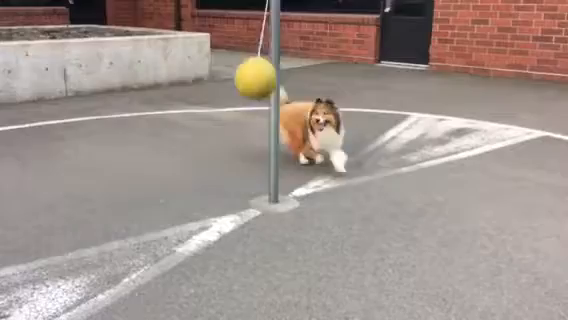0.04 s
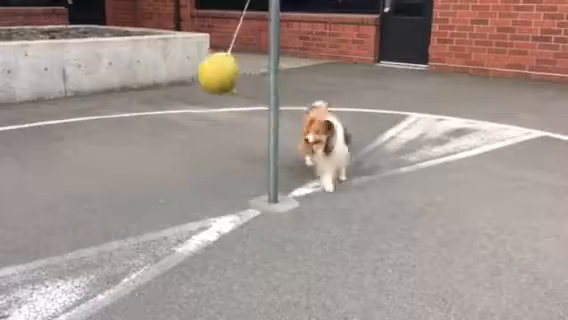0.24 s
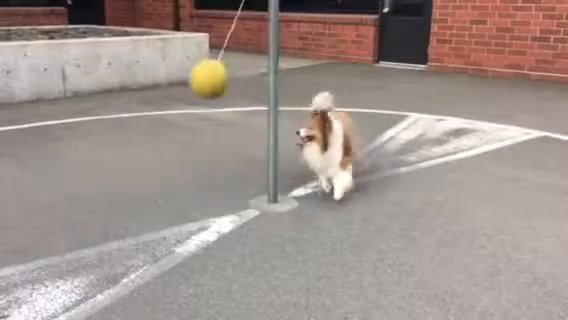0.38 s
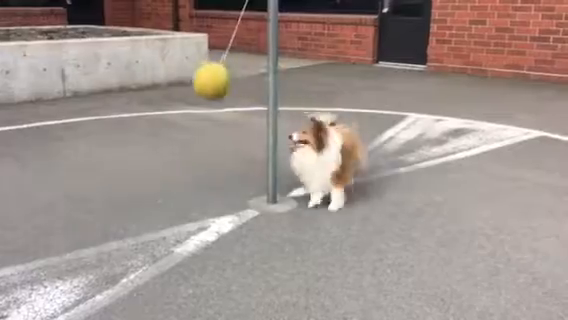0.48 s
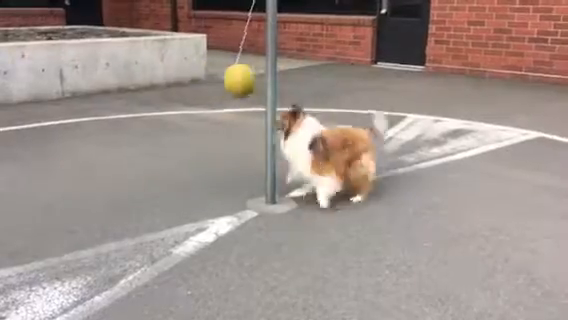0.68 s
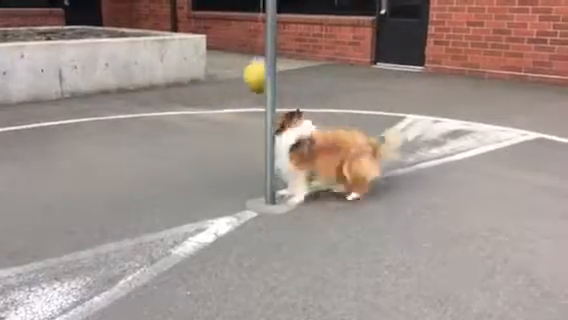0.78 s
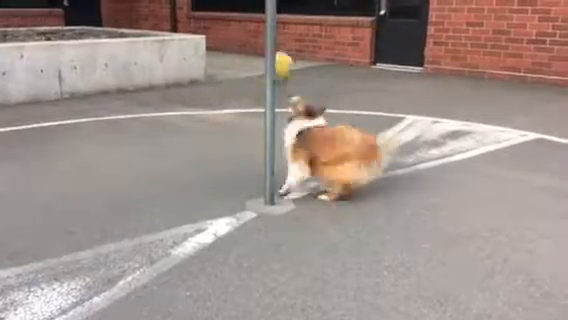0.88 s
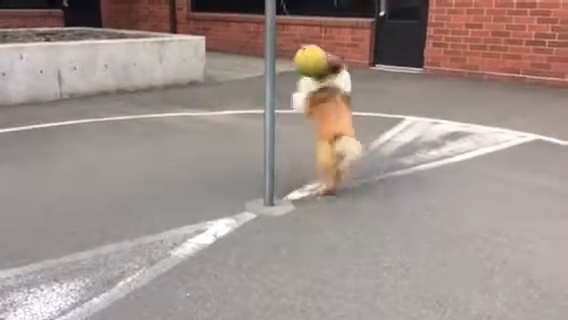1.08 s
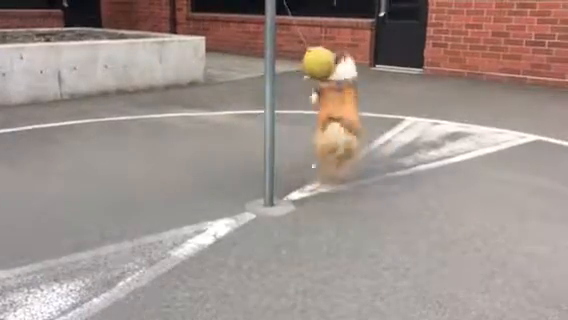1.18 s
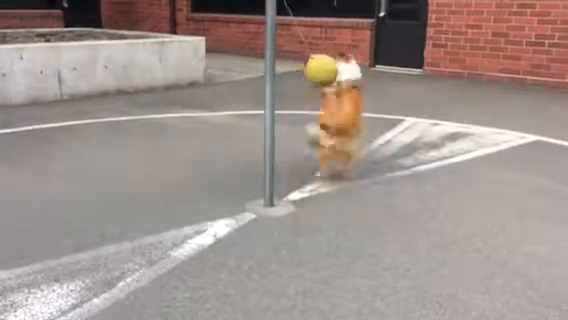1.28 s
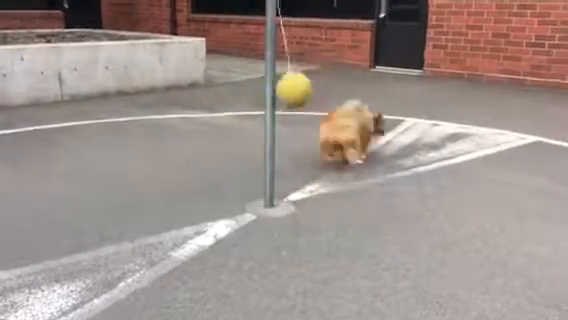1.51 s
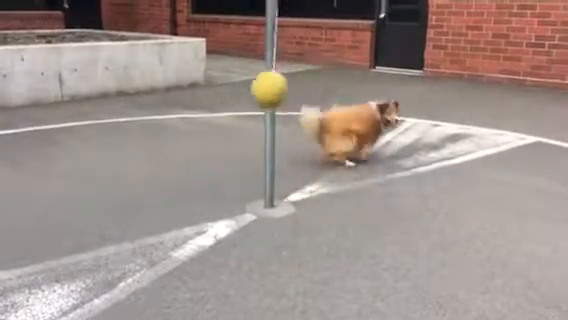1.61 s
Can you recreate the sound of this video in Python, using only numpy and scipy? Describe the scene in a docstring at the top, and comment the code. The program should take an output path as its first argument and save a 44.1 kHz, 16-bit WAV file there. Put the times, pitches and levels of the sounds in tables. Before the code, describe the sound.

A small dog gives one loud, hoarse bark that echoes off the walls of an outdoor court. Faint claw ticks, paw scuffs and soft thuds follow on the asphalt a few steps from the microphone, over a low rumble.

```python
"""A small collie stands on an asphalt court between brick walls, over a low outdoor rumble.
A paw scuffs, claws tick and a soft grunt leads into one hoarse bark at about 0.22 s: vocal-fold
pulses and turbulent air excite the throat resonances, and the pitch falls as the mouth closes.
The walls reflect the bark and the court reverberates. From about 0.45 s the dog jumps at a tethered
ball, heard as its footwork: impacts make ticks and thuds, friction makes scuffs and squeaks."""
import sys
import numpy as np
from scipy import signal
from scipy.io import wavfile
from scipy.ndimage import uniform_filter1d, minimum_filter1d

SR = 44100
rng = np.random.default_rng(int(sys.argv[2]) if len(sys.argv) > 2 else 0)


def file_out(sig):
    """Save sig as 16-bit WAV at sys.argv[1]."""
    # one column per channel
    cols = np.atleast_2d(sig).T
    # limit, then scale
    lim = np.clip(cols, -1, 1)
    pcm = np.round(lim * 32767).astype(np.int16)
    wavfile.write(sys.argv[1], SR, pcm)


N = 72765
T = np.arange(N) / SR

# Fundamental of the bark. Each row: time in seconds, frequency in Hz.
BARK_PITCH = [(.22, 562.3), (.243, 533.2), (.25, 482.5), (.258, 420.1), (.272, 392.7), (.284, 371.6),
              (.3, 374), (.32, 380), (.338, 294)]
# Hoarseness. Each row: time in seconds, roughness 0-1, depth 0-1 of a throb on every third fold pulse.
HOARSENESS = [(.225, .75, .2), (.243, .5, .4), (.258, .36, .2), (.28, .18, .1), (.295, .5, .35),
              (.31, .58, .5), (.324, .33, .2), (.335, .62, .2)]
# Throat resonances. Each row: time in seconds, then the centres of four formants in Hz.
FORMANTS = [(.225, 1016, 1410, 2710, 3700), (0.241, 1078, 1515, 2770, 3810), (0.259, 845, 1485, 2623, 3810),
            (0.283, 830, 1685, 2500, 3746), (0.301, 730, 1521, 2758, 3700), (.318, 620, 1569, 3020, 3744),
            (.336, 546, 1520, 2980, 3896)]
# Each entry: bandwidth in Hz of one formant's resonator, which the sound passes twice.
FORMANT_WIDTHS = [416.5, 696, 810, 612]
# Envelope of the bark. Each row: time in seconds, four formant levels ahead of the muzzle in dB, hiss
# level in dB.
BARK_LEVELS = [(.212, -63, -67.5, -68, -77, -75), (.222, -43, -53.5, -46, -56.5, -66.5),
               (.232, -22.5, -23, -29.5, -54, -44), (.244, -12, -17, -17.5, -36.5, -42.5),
               (.258, -14.5, -18, -11.5, -42.5, -34), (.27, -20.5, -16.5, -15, -61.5, -45.5),
               (.284, -23.5, -13.5, -52, -41.5, -50), (.304, -33, -11.5, -25, -64, -45.5),
               (.316, -29, -9.5, -25, -70.5, -46.5), (.326, -36.5, -15, -32.5, -75, -54),
               (.337, -29, -40.5, -58, -69, -53.5), (.35, -80, -74, -87.5, -85, -87)]
# Transfer function of the muzzle. Each row: frequency in Hz, gain in dB.
MUZZLE_GAIN = [(60, -30), (200, -16.5), (370, -9.5), (480, 3.5), (620, 2.5), (850, -5.5), (1100, -2.5),
               (1340, 4), (1520, -0.5), (1730, 0.5), (1880, 4.5), (2130, -0.5), (2450, 0), (3100, -3),
               (3450, -1.5), (3800, 2.5), (4300, 0), (4900, -10), (16000, -44.5)]
# Bright treble peaks. Each row: centre in Hz at mid-bark, bandwidth in Hz, relative gain in dB.
HISS_PEAKS = [(4420, 420, 0), (5400, 97, -2), (6640, 830, 3), (7930, 744, 4), (8770, 1100, 0),
              (10010, 240, -3.5), (11290, 900, -5), (15300, 900, -17)]
# Claw strikes. Each row: start in seconds, relative level in dB, frequency ratio to the usual tick.
CLAW_STRIKES = [(0.147, -42.5, 1.2), (0.181, -44.5, 1.4), (.361, -39, 0.71), (.406, -47, 1.9),
                (0.524, -46, 1.71), (0.571, -37, 1.27), (0.635, -37, 0.94), (.802, -40, 0.7),
                (0.815, -38.5, 0.78), (0.8992, -35, 0.91), (0.907, -39, 0.95), (0.9143, -38, 1.06),
                (0.921, -36, 0.95), (0.977, -37, 0.42), (0.989, -36.5, 1.25), (1.002, -41, 0.4),
                (1.024, -42, 2.77), (1.158, -47, 1.35), (1.201, -37, 1.02), (1.205, -36, 0.89),
                (1.226, -34.5, 0.54), (1.418, -35, 0.39), (1.42, -36, 0.81), (1.437, -46.5, 0.85),
                (1.5526, -31, 1.2), (1.57, -30, 0.82)]
# Spectrum of the usual tick and of grit. Each row: frequency in Hz, relative level in dB.
TICK_SPECTRUM = [(100, -40.5), (1200, -13.5), (2800, -2), (4500, -1.5), (7000, 1), (10000, -4), (13000, -9),
                 (16000, -8), (30000, -27)]
# Sliding paws. Each row: start in seconds, length in seconds, body level in dB, body centre in Hz,
# rasp centre in Hz, grit level in dB.
PAW_SLIDES = [(-.012, 0.041, -40, 1823, 3390, -60.5), (0.452, 0.15, -47, 1720, 3560, -70),
              (0.507, 0.095, -38.5, 1983, 3250, -69), (0.595, 0.12, -55, 1800, 3620, -63),
              (0.766, 0.085, -55, 2009, 3710, -64.5), (0.947, 0.035, -53.5, 1954, 3980, -84),
              (0.967, 0.089, -55.5, 1670, 3610, -66), (1.217, 0.091, -54, 334, 1078, -74),
              (1.247, 0.057, -53.5, 1900, 3150, -81), (1.541, 0.09, -53.5, 1760, 2000, -63)]
# Spectrum of a scuff centred on SCUFF_CENTRE_HZ. Each row: frequency in Hz, relative level in dB.
SCUFF_SPECTRUM = [(100, -17), (600, -18), (950, -27), (1150, 0), (1400, -2.5), (1750, 2.5), (2150, 0),
                  (2600, -21), (3150, -10.5), (3900, -18), (4800, -27), (9000, -31), (16000, -43)]
# Pad squeaks. Each row: start in seconds, length in seconds, fundamental in Hz, base level in dB.
PAD_SLIPS = [(0.959, 0.0058, 1091, -46), (0.9636, 0.0063, 527, -41), (1.258, 0.0091, 988, -45.5),
             (1.582, 0.013, 836, -47.5)]
# Each entry: level in dB of one squeak harmonic against the base level, fundamental first.
SQUEAK_HARMONICS = [-24, -1.5, -5, -20]
# Paw thuds. Each row: start in seconds, frequency in Hz, peak level of the fundamental in dB.
PAW_IMPACTS = [(0.484, 106.8, -40.5), (0.787, 103, -48.5), (0.932, 109.2, -51.5), (1.216, 227.5, -48),
               (1.238, 123.3, -49), (1.53, 74, -42.5)]
# Wall echoes. Each row: delay in seconds, level in dB ahead of WALL_GAIN.
REFLECTIONS = [(.005, -11.5), (0.012, -16.5), (.035, -18), (0.053, -20.5), (0.069, -25), (.11, -35.5),
               (0.171, -43), (0.519, -54)]
# Filter on all reflected sound. Each row: frequency in Hz, gain in dB.
WALL_GAIN = [(50, -46.5), (350, 0.5), (500, 3.5), (650, 9), (820, 2.5), (1000, 1.5), (1300, -4), (1560, -5),
             (1880, 0), (2100, 1), (2700, -4), (4000, 1), (8000, -2.5), (16000, -1)]
# Reverberation time of the court. Each row: frequency in Hz, seconds to decay by 60 dB.
REVERB_TIMES = [(100, 6), (600, 1.91), (1700, 1.31), (1880, 1.75), (2100, 1.15), (6000, 1.2), (16000, 0.6)]
# Outdoor background. Each row: frequency in Hz, relative spectral density in dB.
AMBIENT_SPECTRUM = [(15, -27), (35, -10), (60, 2), (85, -2), (120, -4.5), (170, -11), (260, -14),
                    (370, -18.5), (490, -29.5), (650, -19.5), (900, -17.5), (1700, -22), (2600, -30.5),
                    (5000, -40.5), (10000, -49), (16000, -58)]

JITTER, SHIMMER, WOBBLE_S = 0.0606, 0.013, 0.001964  # rms pitch (at roughness 1), rms gain, memory
FOLD_LAG = 0.3524  # spread of each fold pulse, in radians per harmonic number squared
PUFF_FLOOR, PUFF_DECAY_CYCLES, HISS_DECAY_CYCLES = 0.68, 0.29, 0.35
CHEST_HZ, CHEST_WIDTH_HZ, CHEST_DB = 336, 510, -45
HISS_RISE_PER_S, MID_BARK_S = 1.1, .275
GRUNT_START_S, GRUNT_LENGTH_S, GRUNT_HZ, GRUNT_RISE_HZ = .161, .054, 257, 112
GRUNT_DB, GRUNT_DB_PER_OCTAVE = -39, -12.5
TICK_DECAY_S, TICK_GAIN_DB, RING_DECAY_S, RING_DB = 0.0013, -8, 0.0022, -33.5
SCUFF_CENTRE_HZ, SCUFF_SKEW, SCUFF_SQUARENESS = 1829, 0.77, 0.67
RASP_WIDTH_HZ, RASP_RELATIVE_DB, GRIT_SPREAD_DB = 250, -9.5, 2.5
THUD_RISE_S, THUD_OVERTONE_DB = 0.02, -10
ECHO_SMEAR_S, TAIL_DELAY_S, TAIL_DB = 0.0036, 0.021, -24.5
AMBIENT_DB, DRONE_HZ, DRONE_WIDTH_HZ, DRONE_DB = -53, 60, 36, -56


def bark():
    """Source and filter: fold pulses and puffs of air excite moving formants, muzzle and chest."""
    (hz,), (roughness, throb) = curves(BARK_PITCH), curves(HOARSENESS)
    cycles = np.cumsum(hz * (1 + JITTER * roughness * wobble())) / SR
    folds = unit(sum(np.cos(2 * np.pi * k * cycles - FOLD_LAG * k ** 2) for k in np.arange(1, 15)))
    folds *= 1 + SHIMMER * wobble()
    airflow = unit(PUFF_FLOOR + np.exp(-(cycles % 1) / PUFF_DECAY_CYCLES))
    breath = unit(signal.lfilter(*signal.butter(2, 5500, fs=SR), rng.standard_normal(N)))
    puffs = airflow * breath
    source = (1 - roughness) * folds + roughness * puffs
    *formant_db, hiss_db = curves(BARK_LEVELS)
    voice = sum(amp(db) * steady(resonate_twice(source, centre, width), size=220)
                for db, centre, width in zip(formant_db, curves(FORMANTS), FORMANT_WIDTHS))
    voice *= (1 + throb * np.cos(2 * np.pi * cycles / 3)) / np.sqrt(1 + throb ** 2 / 2)  # subharmonics
    chest_db = CHEST_DB + (formant_db[1] - formant_db[1].max()) / 2  # follows the second formant
    chest = amp(chest_db) * unit(resonate_twice(puffs, CHEST_HZ, CHEST_WIDTH_HZ))
    return colour(voice, MUZZLE_GAIN) + chest + amp(hiss_db) * hiss(cycles)


def wobble():
    """Vocal-fold perturbation: low-passed noise of rms 1 for quick unsteadiness in pitch or level."""
    smoothed = uniform_filter1d(rng.standard_normal(N), size=40)
    return unit(signal.lfilter([1], [1, -np.exp(-1 / (WOBBLE_S * SR))], smoothed))


def hiss(cycles):
    """Band-pass filtering of pulsed noise: bright treble peaks that rise slightly through the bark."""
    pulsed = unit(np.exp(-(cycles % 1) / HISS_DECAY_CYCLES)) * rng.standard_normal(N)
    climb = 1 + np.clip(HISS_RISE_PER_S * (T - MID_BARK_S), -.1, .1)
    return unit(sum(amp(db) * resonate(pulsed, hz * climb, width) for hz, width, db in HISS_PEAKS))


def grunt():
    """Closed-mouth voicing: a short rising tone with weak upper harmonics as the dog winds up."""
    elapsed = progress(GRUNT_START_S, GRUNT_LENGTH_S)
    phase = 2 * np.pi * np.cumsum(GRUNT_HZ + GRUNT_RISE_HZ * elapsed) / SR
    tone = sum(amp(GRUNT_DB_PER_OCTAVE * np.log2(k)) * np.sin(k * phase) for k in np.arange(1, 5))
    return amp(GRUNT_DB) * np.sin(np.pi * elapsed) ** 2 * tone


def claws():
    """Hard impact: the brief contact of a claw gives a broadband burst with a faint, slower decay."""
    out, age = np.zeros(N), T[:SR // 16]
    decay = np.exp(-age / TICK_DECAY_S) + amp(RING_DB) * np.exp(-age / RING_DECAY_S)
    for start, db, stretch in CLAW_STRIKES:
        tick = amp(db + TICK_GAIN_DB) * decay * noise(TICK_SPECTRUM, stretch, len(age))
        slot = out[round(start * SR):][:len(tick)]
        slot += tick[:len(slot)]
    return out


def scuffs():
    """Sliding friction: pads on asphalt give a soft body of noise, a narrow rasp and rolling grit."""
    out = np.zeros(N)
    for start, length, body_db, body_hz, rasp_hz, grit_db in PAW_SLIDES:
        stroke = abs(np.sin(np.pi * progress(start, length) ** SCUFF_SKEW)) ** SCUFF_SQUARENESS
        grains = rng.standard_normal(N) * amp(GRIT_SPREAD_DB * np.minimum(rng.exponential(1, N), 5))
        grains *= rng.random(N) < .08  # sparse contacts
        grit = unit(colour(grains, TICK_SPECTRUM))
        body = noise(SCUFF_SPECTRUM, body_hz / SCUFF_CENTRE_HZ)
        rasp = amp(RASP_RELATIVE_DB) * unit(resonate(rng.standard_normal(N), rasp_hz, RASP_WIDTH_HZ))
        out += stroke * grip() * (amp(body_db) * (body + rasp) + amp(grit_db) * grit)
    return out


def grip(spread_db=2, patch_s=0.0034):
    """Amplitude modulation by the uneven grip of a sliding pad, as a gain of rms 1."""
    patches = unit(uniform_filter1d(rng.standard_normal(N), int(patch_s * SR)))
    return unit(amp(spread_db * patches))


def squeaks():
    """Stick-slip oscillation: a pad catches and slips for a few cycles, giving a tiny harmonic tone."""
    out = np.zeros(N)
    for start, length, hz, db in PAD_SLIPS:
        swell = np.sin(np.pi * progress(start, length))
        cycles = hz * (T - start)
        for k, harmonic_db in enumerate(SQUEAK_HARMONICS, 1):
            out += swell * amp(db + harmonic_db) * np.sin(2 * np.pi * (k * cycles + rng.random()))
    return out


def thuds():
    """Soft impact: the slow push of a landing or a spring carries only low frequencies."""
    out = np.zeros(N)
    for start, hz, db in PAW_IMPACTS:
        age = np.maximum(T - start, 0)
        rise, phase = age / THUD_RISE_S, 2 * np.pi * hz * age
        push = (rise * np.exp(1 - rise)) ** 2
        out += amp(db) * push * (np.sin(phase) + amp(THUD_OVERTONE_DB) * np.sin(2 * phase))
    return out


def court(x):
    """Reflection: the walls return smeared echoes and a thin tail that dies faster in the treble."""
    hz, t, spectra = signal.stft(rng.standard_normal(N), SR, nperseg=256)
    decay = amp(-60 * t / value_at(REVERB_TIMES, hz)[:, None])
    tail = signal.istft(spectra * decay, SR, nperseg=256)[1][:N]
    tail *= progress(TAIL_DELAY_S, TAIL_DELAY_S)  # waits, then fades in
    response = amp(TAIL_DB) * tail / np.linalg.norm(tail)
    for delay, db in REFLECTIONS:
        slap = rng.standard_normal(N) * (T >= delay) * np.exp(-abs(T - delay) / ECHO_SMEAR_S)
        response += amp(db) * slap / np.linalg.norm(slap)
    return signal.fftconvolve(x, colour(response, WALL_GAIN))[:N]


def background():
    """Ambient noise: the broadband rumble of a distant town and a wavering narrow-band drone."""
    drone = steady(resonate(rng.standard_normal(N), DRONE_HZ, DRONE_WIDTH_HZ), size=8000)
    return amp(AMBIENT_DB) * noise(AMBIENT_SPECTRUM) + amp(DRONE_DB) * drone


def amp(db):
    """Amplitude ratio of a level in decibels."""
    return 10 ** (np.asarray(db) / 20)


def unit(x):
    """Normalisation to rms 1."""
    return x / np.sqrt(np.mean(x ** 2) + 1e-20)


def steady(x, size):
    """Gain control: holds the short-term rms near 1, smoothing twice over size samples."""
    power = uniform_filter1d(uniform_filter1d(x ** 2, size), size)
    return x / np.sqrt(abs(power) + 1e-12)


def progress(start, length):
    """Linear ramp from 0 to 1 across an event timed in seconds."""
    return np.clip((T - start) / length, 0, 1)


def curves(table):
    """Linear interpolation of each column of a timed table at every sample."""
    times, *columns = np.transpose(table)
    return [np.interp(T, times, column) for column in columns]


def value_at(table, hz):
    """Interpolation of a table on a logarithmic frequency axis."""
    frequencies, values = np.transpose(table)
    return np.interp(np.log(hz + 1), np.log(frequencies + 1), values)


def colour(x, spectrum, stretch=1):
    """Minimum-phase filtering by a spectrum whose frequencies are multiplied by stretch."""
    size = 4096
    hz = abs(np.fft.fftfreq(size, 1 / SR))
    log_gain = np.log(amp(value_at(spectrum, hz / stretch)))
    taps = np.fft.ifft(np.exp(np.conj(signal.hilbert(log_gain)))).real
    return signal.fftconvolve(x, taps[:size // 2])[:len(x)]


def noise(spectrum, stretch=1, samples=N):
    """Spectral shaping of white noise, at rms 1."""
    return unit(colour(rng.standard_normal(samples), spectrum, stretch))


def resonate(x, hz, width):
    """Resonance by heterodyning: shifts hz, fixed or moving, to zero, low-passes and shifts back."""
    carrier = np.exp(2j * np.pi * np.cumsum(hz * np.ones(N)) / SR)
    pole = np.exp(-np.pi * width / SR)
    baseband = signal.lfilter([(1 - pole) ** 2], [1, -2 * pole, pole * pole], x / carrier + 1e-18)
    return 2 * (carrier * baseband).real


def resonate_twice(x, hz, width):
    """Two equal resonances in cascade give a narrower, steeper band."""
    return resonate(resonate(x, hz, width), hz, width)


def scene():
    """Superposition of the dog's direct sound, its reflections and the background."""
    dog = bark() + grunt() + claws() + scuffs() + squeaks() + thuds()
    return (dog + court(dog) + background())[None]


def record(dry):
    """Band and peak limiting: a low cut, a quick limiter and a steep treble cut."""
    low_cut_hz, high_cut_hz, ceiling_db, hold_s = 42, 16000, -3.3, 0.0012
    x = signal.lfilter(*signal.butter(3, low_cut_hz, "high", fs=SR), dry[0])
    hold = int(hold_s * SR)
    gain = np.minimum(1, amp(ceiling_db) / (abs(x) + 1e-9))
    x *= uniform_filter1d(minimum_filter1d(gain, hold), hold)
    low_pass = signal.firwin(511, high_cut_hz, window=("kaiser", 9), fs=SR)
    return signal.oaconvolve(x, low_pass, "same")[None]


dry = scene()
out = record(dry)
file_out(out)
```